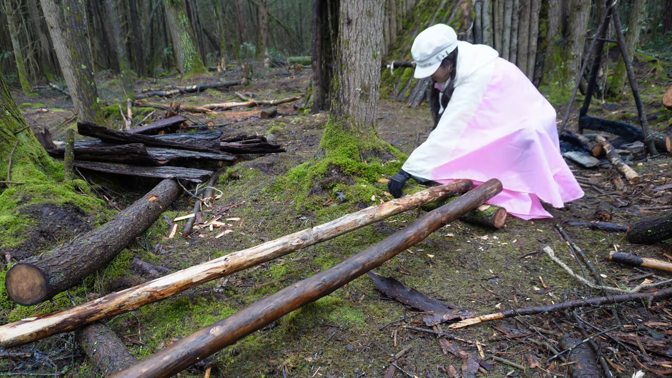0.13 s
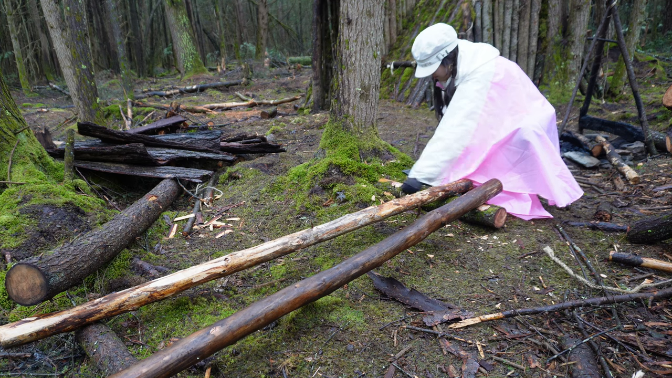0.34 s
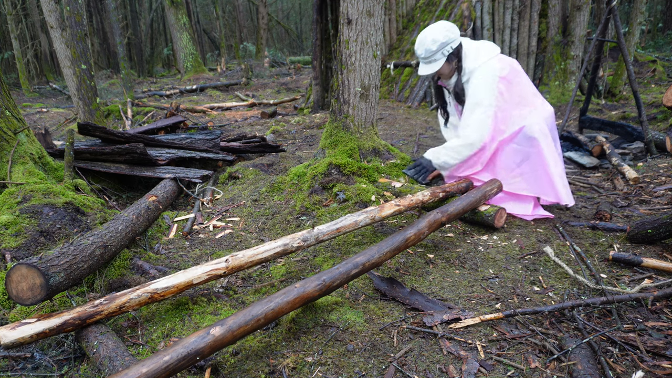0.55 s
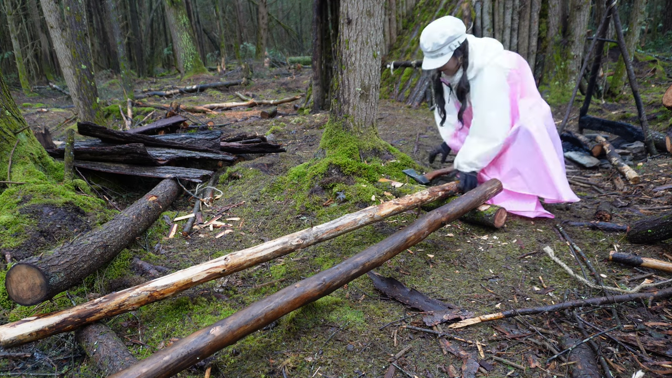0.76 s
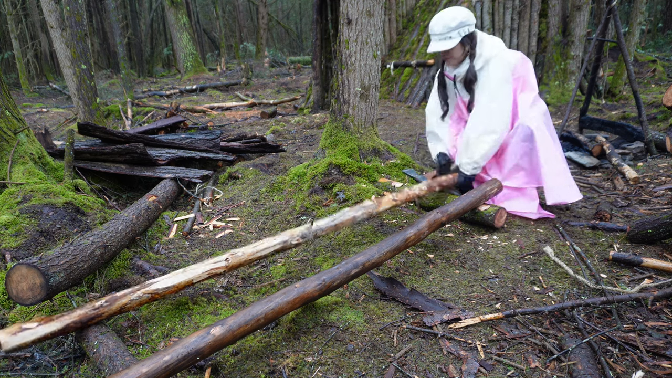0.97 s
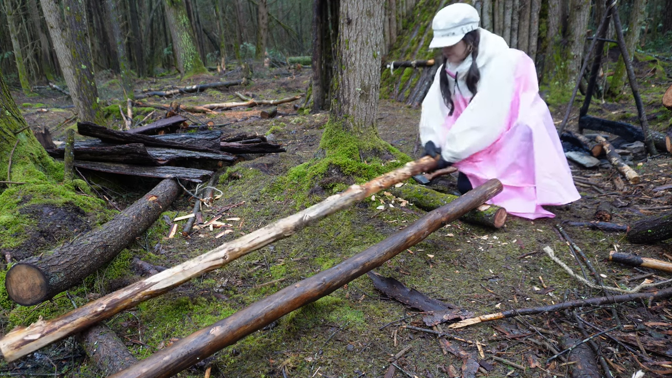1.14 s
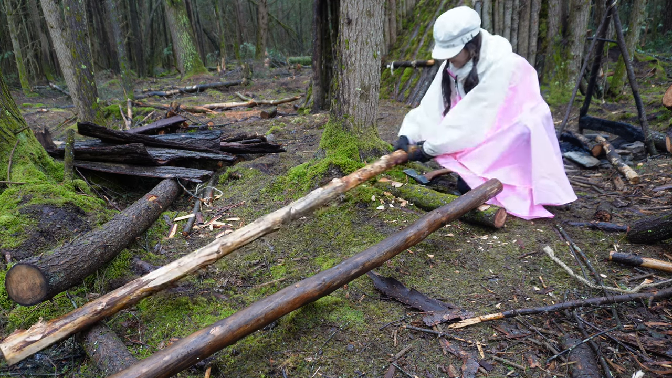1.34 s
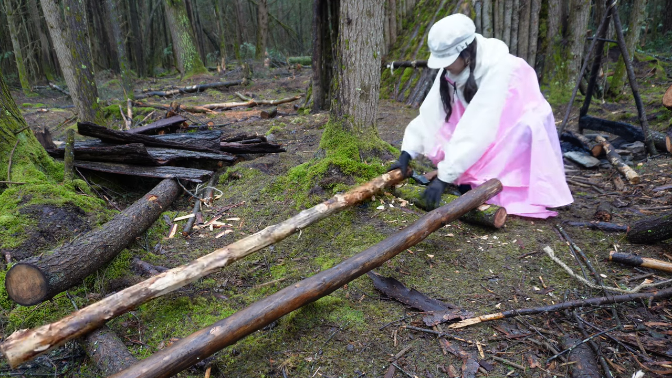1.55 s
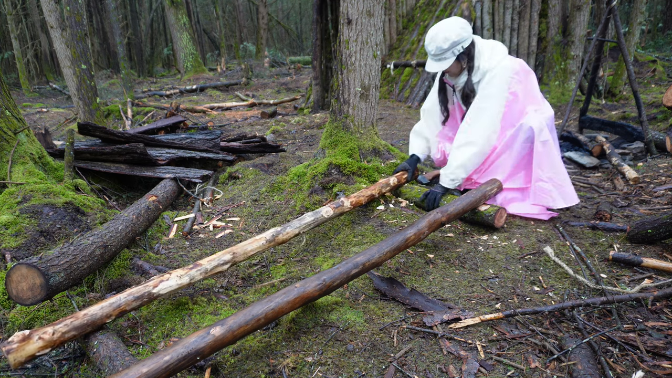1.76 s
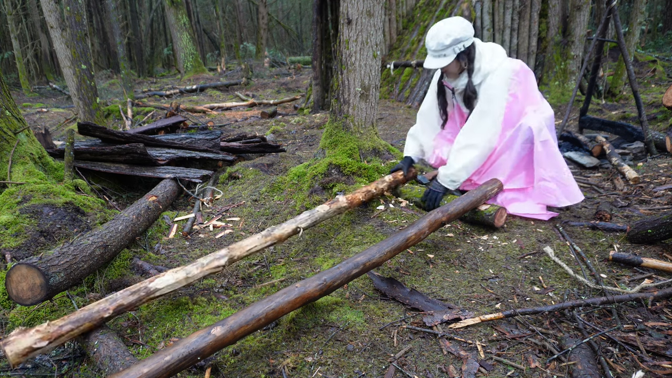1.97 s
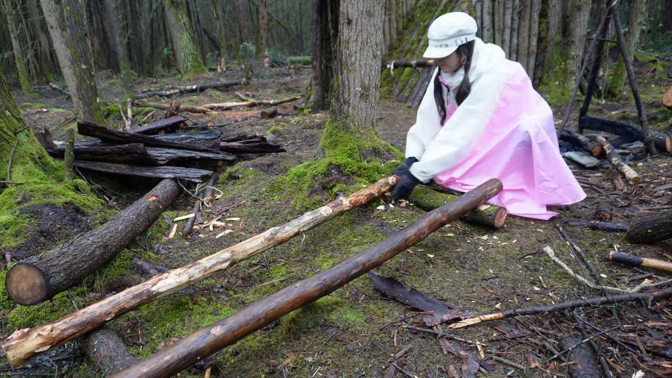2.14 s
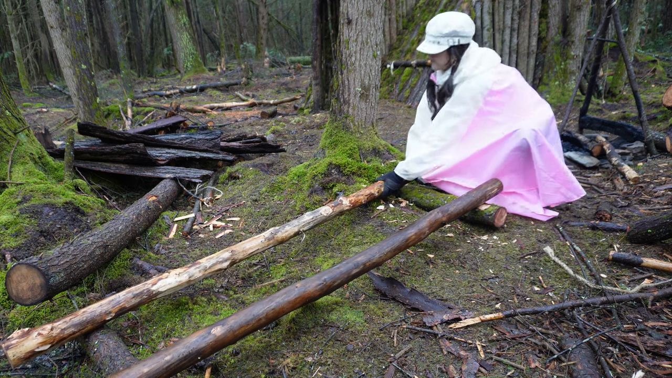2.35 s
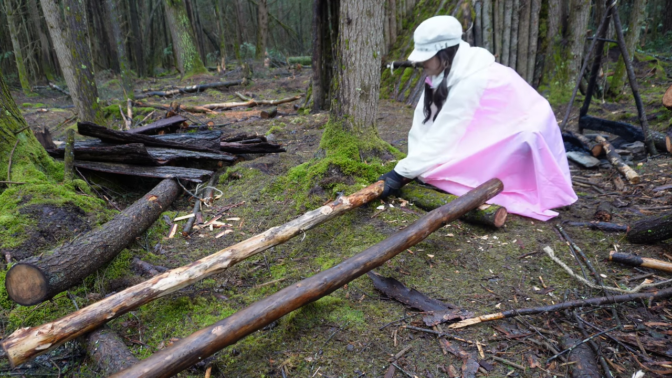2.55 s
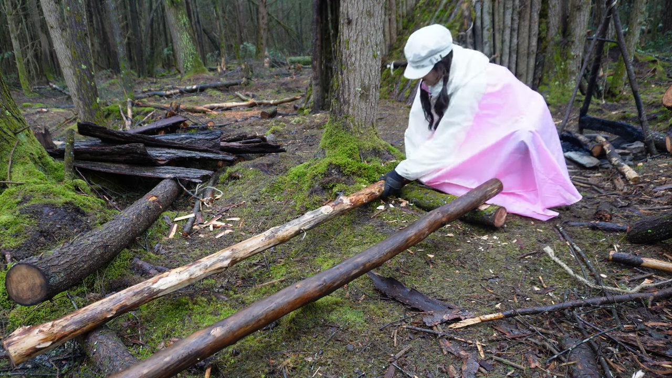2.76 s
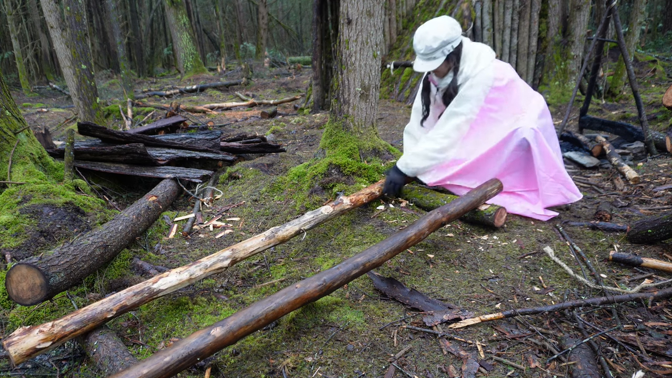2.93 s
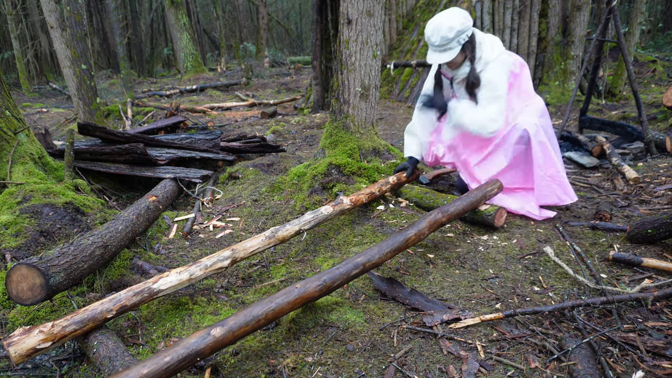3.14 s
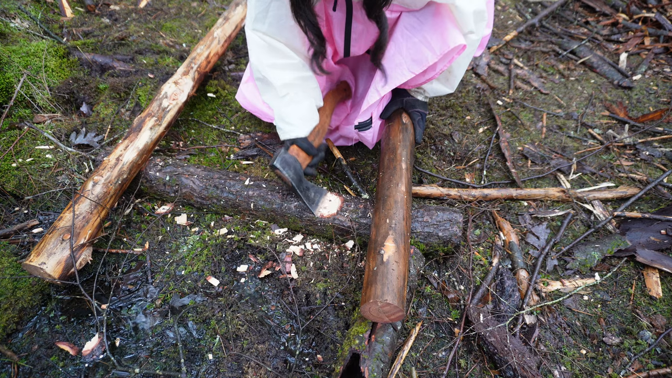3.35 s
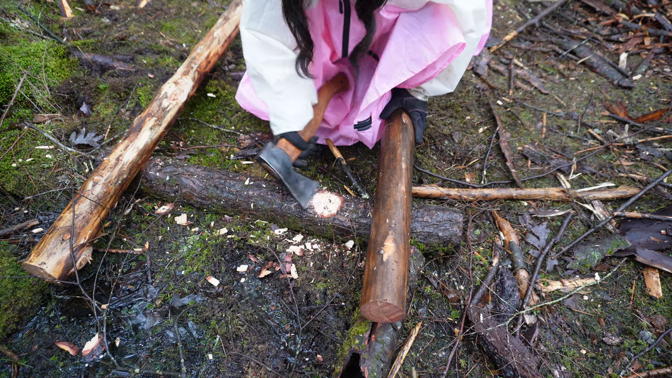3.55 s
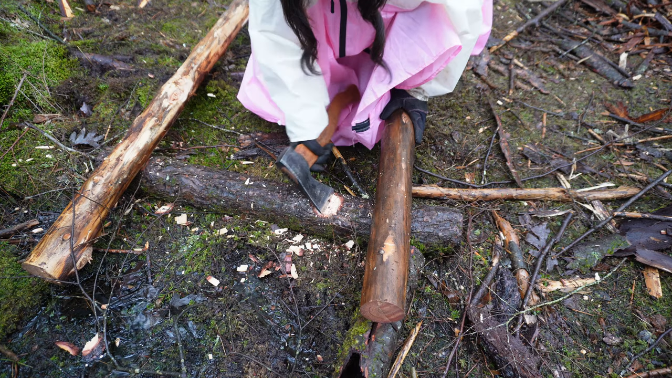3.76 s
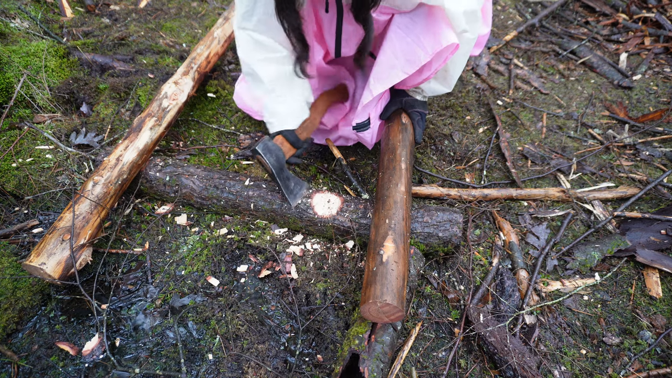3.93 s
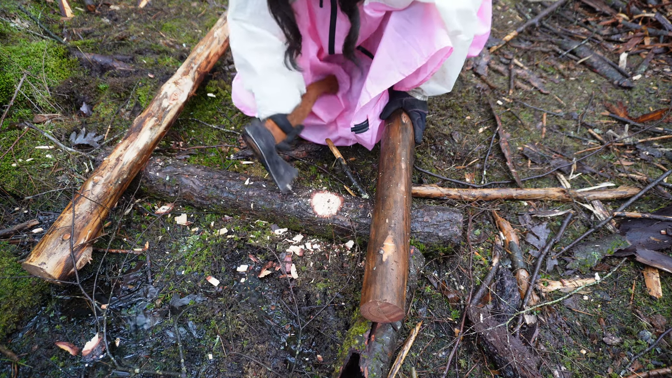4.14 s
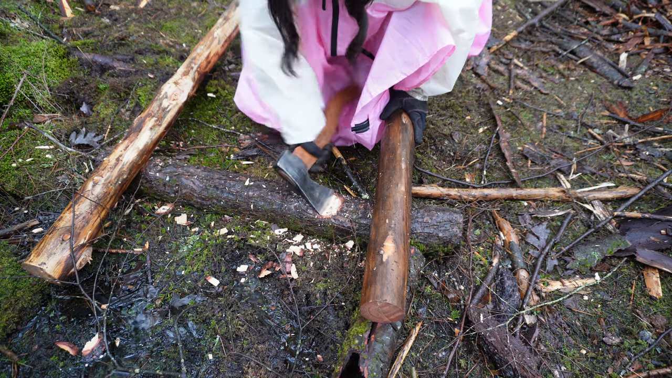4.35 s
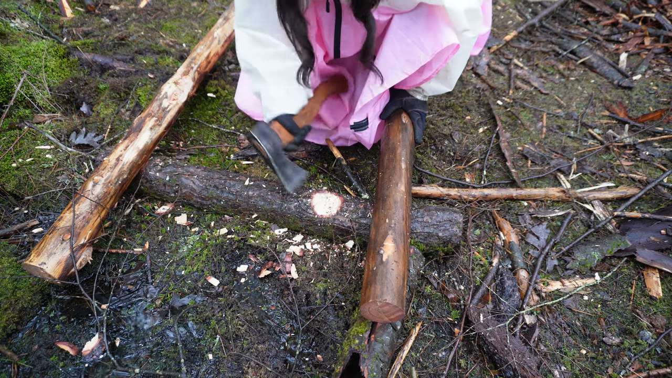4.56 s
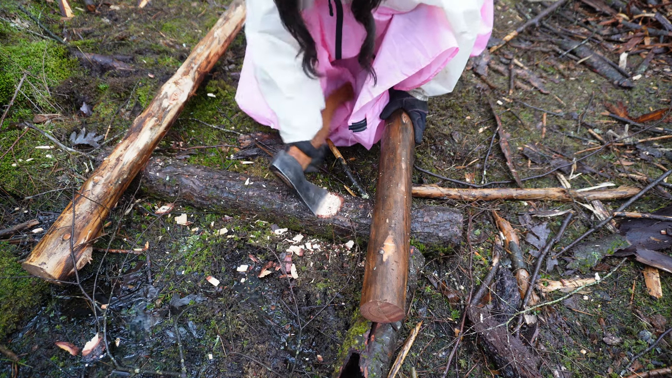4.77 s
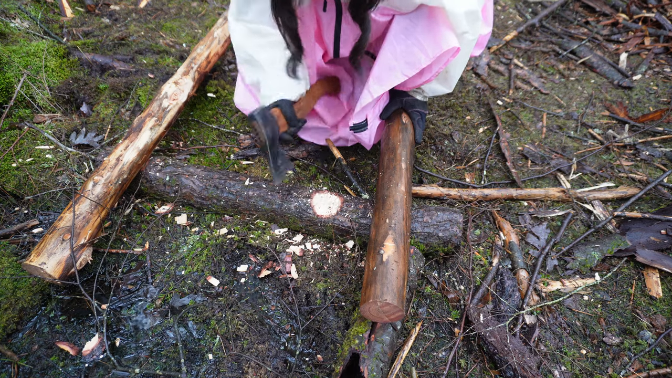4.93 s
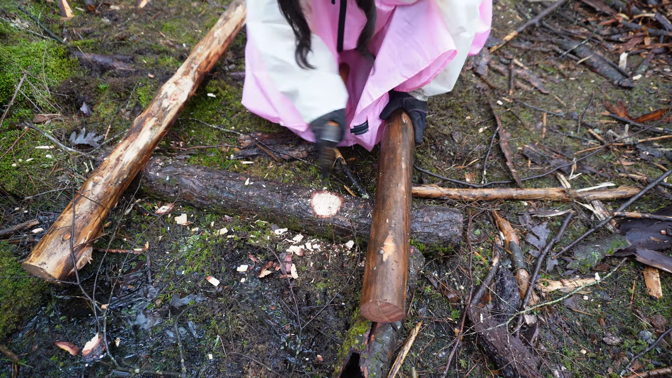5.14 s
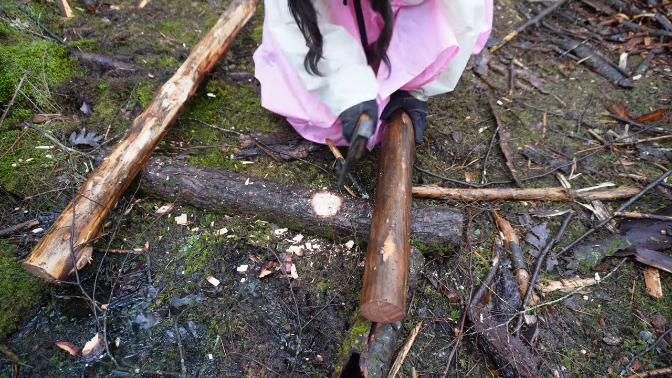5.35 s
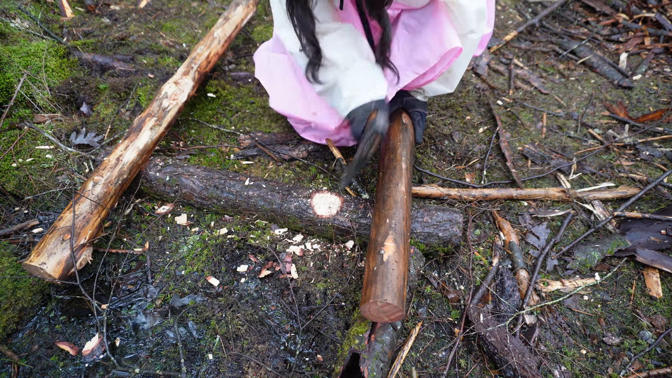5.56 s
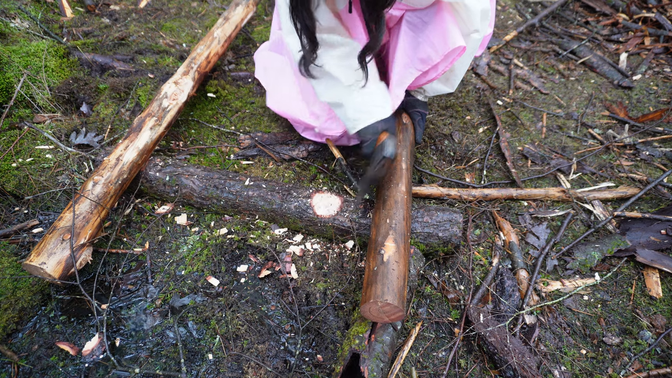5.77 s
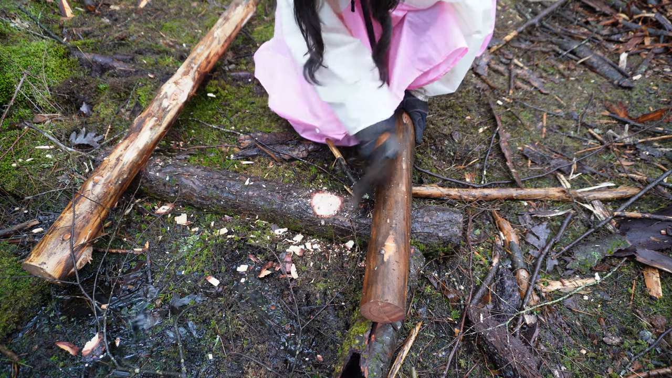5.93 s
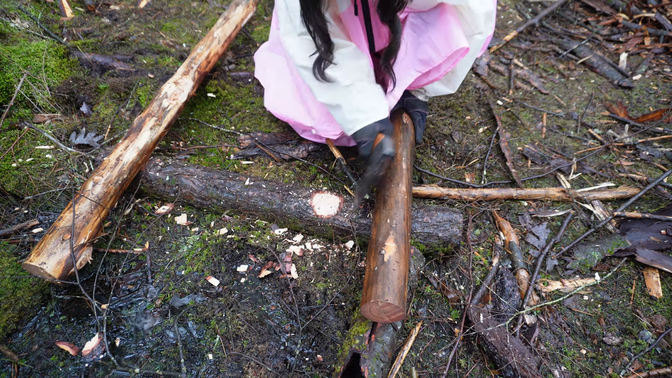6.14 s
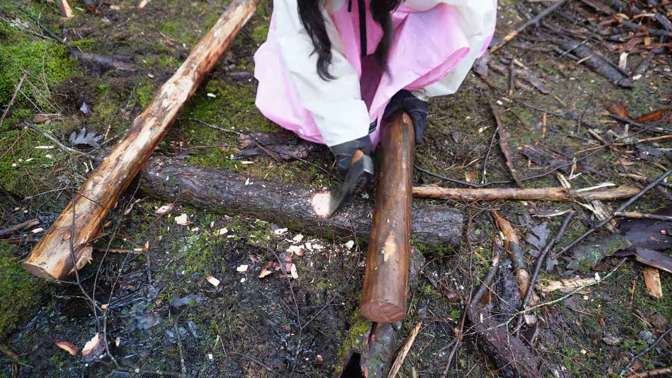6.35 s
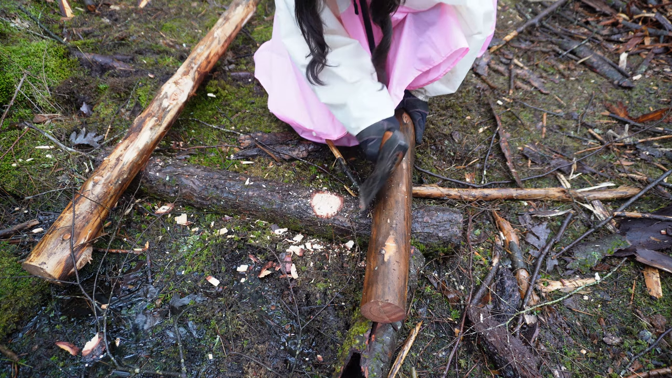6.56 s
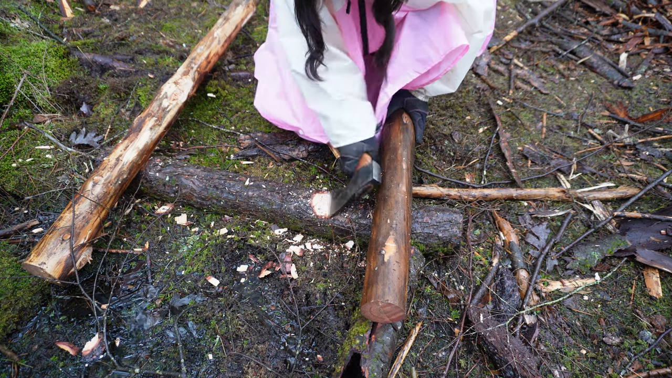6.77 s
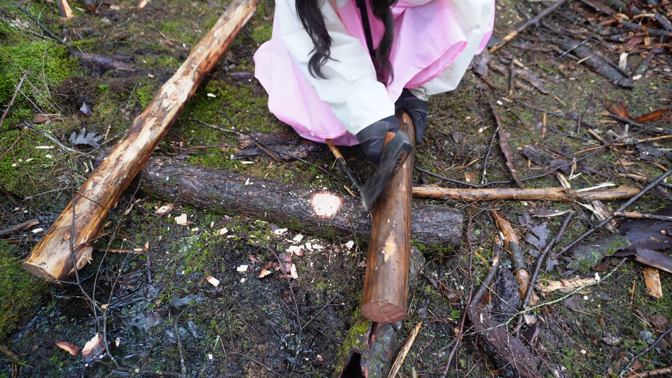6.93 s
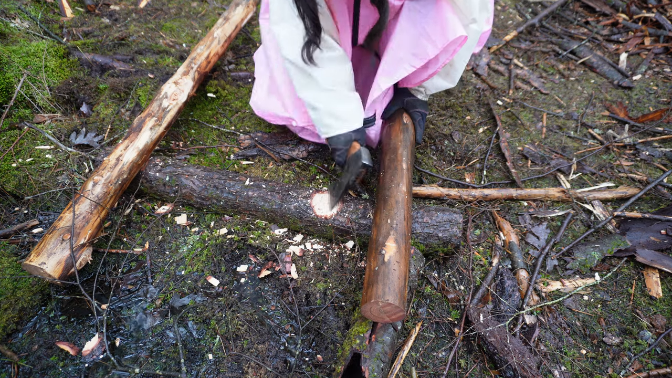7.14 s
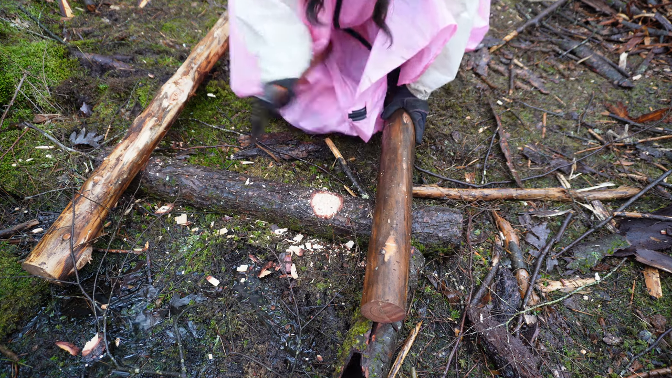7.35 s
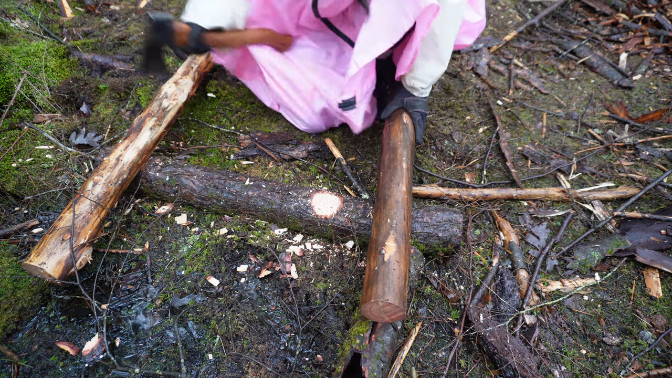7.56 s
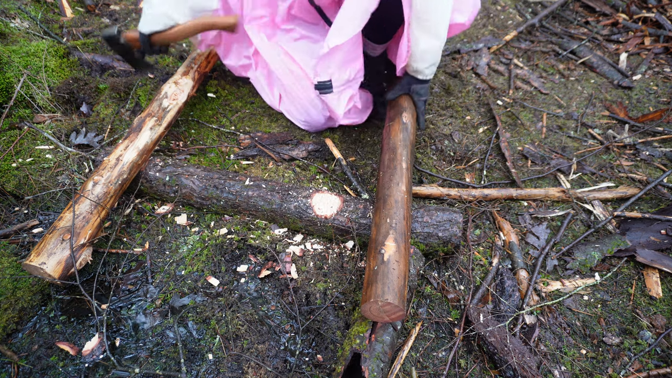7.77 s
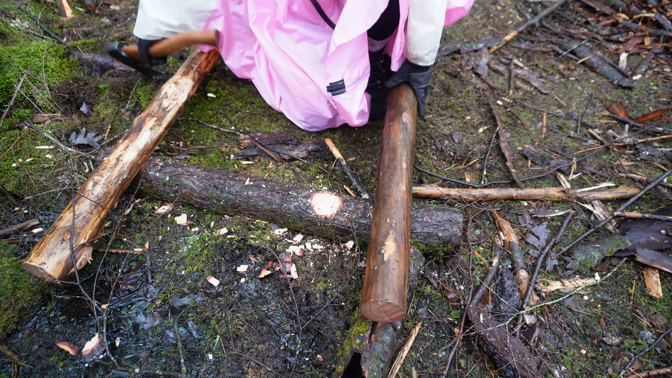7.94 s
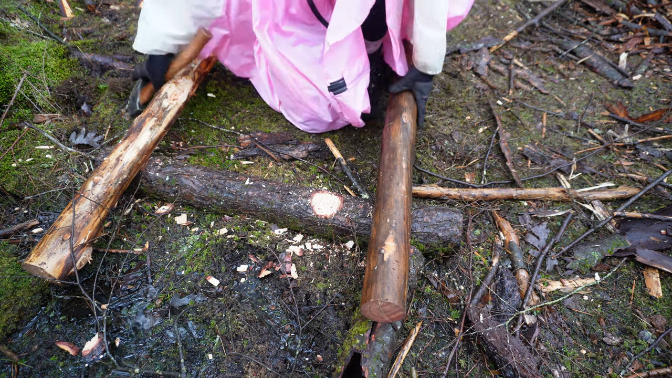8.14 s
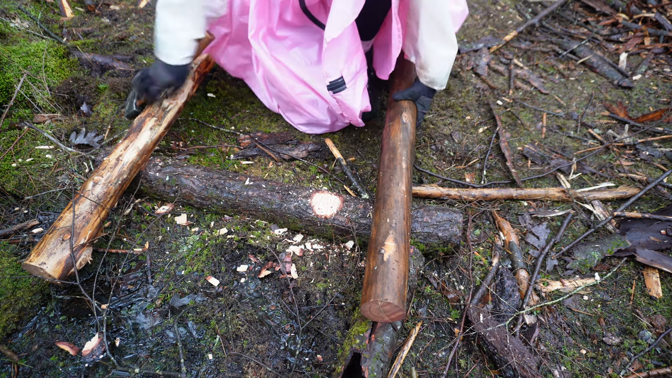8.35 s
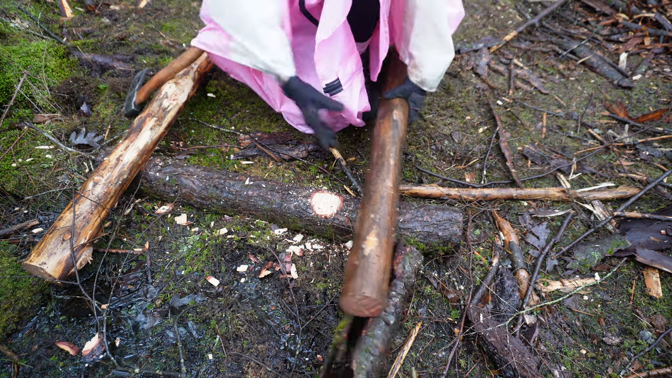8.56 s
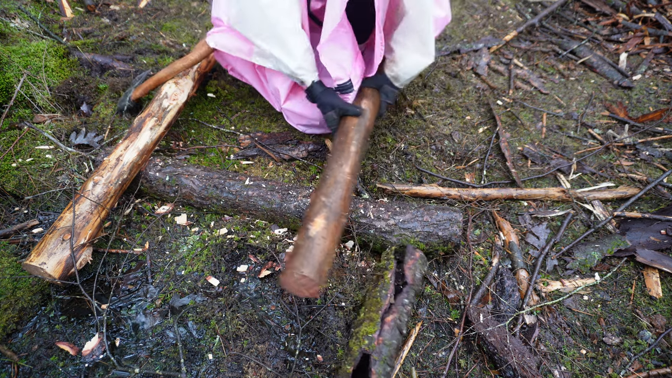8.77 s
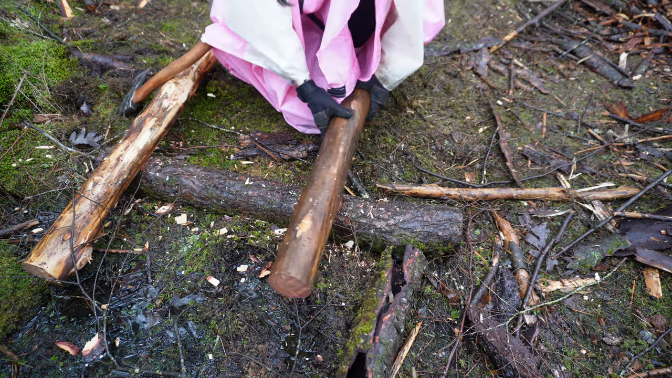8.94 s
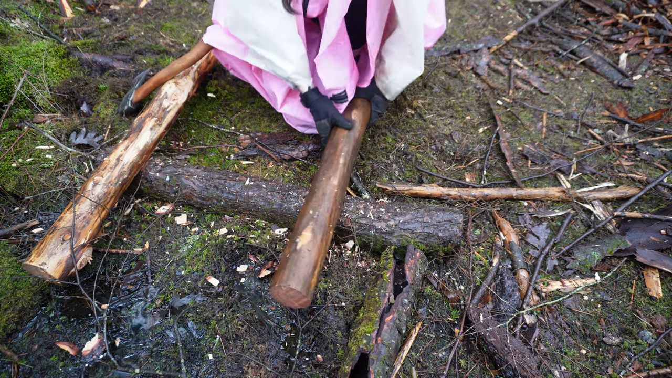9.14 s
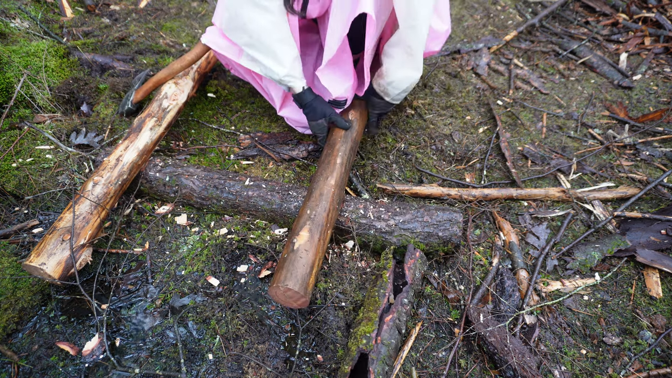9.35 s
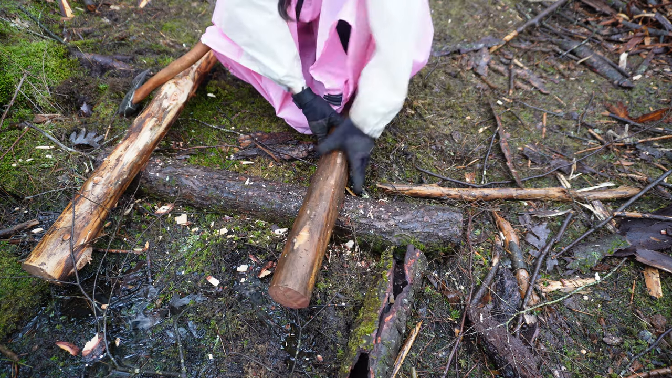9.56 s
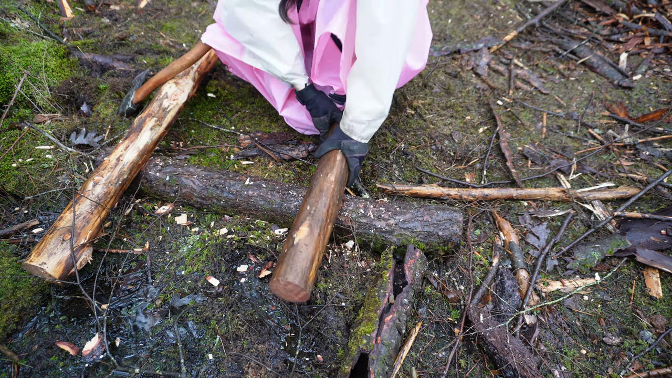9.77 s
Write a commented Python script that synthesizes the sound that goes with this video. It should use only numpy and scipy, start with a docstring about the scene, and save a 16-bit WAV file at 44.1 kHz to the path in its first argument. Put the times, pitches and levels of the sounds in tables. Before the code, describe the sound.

Close and dry outdoors: faint low wind and woodland hiss under rubbing fabric and small twig crackles. After a quiet start come about nine firm axe blows on wet wood, roughly three per second at the fastest, short and woody with a metallic edge. A pause with loud coat swishes follows, then a hollow clack of axe on peeled trunk, busy rustling and chips, and one heavy dull knock.

```python
"""Trimming a pole with a hand axe

A hand axe trims and knocks a wet pole lying across a log on mossy ground: noisy and smooth pushes ring damped
modes. Chips are crackly bursts, a raincoat rustles as shaped noise over forest hiss and wind, and a loose
peeled trunk rings when the axe knocks it or the pole drops onto it. Each hit also sends a slow sway through the
stand. Both channels carry one sound, but their phases slip apart in patches; once the level dips briefly."""
import sys
import numpy as np
from scipy import signal
from scipy.io import wavfile
from scipy.ndimage import uniform_filter1d

SR = 44100
rng = np.random.default_rng(int(sys.argv[2]) if len(sys.argv) > 2 else 0)


def digitize_waveform(pressure):
    """Quantize a signal to 16-bit integers and store it at the path in sys.argv[1].

    Rows of a 2-D input are taken as channels; values are limited to [-1, 1].
    """
    field = np.atleast_2d(pressure).T
    bounded = np.clip(field, -1, 1)
    quanta = np.round(bounded * 32767).astype(np.int16)
    wavfile.write(sys.argv[1], SR, quanta)


N = 432180
REALIGN_S = 3.347  # the level dips and all bands fall into step


def gain_of(db):
    """Amplitude factor of a level in dB."""
    return 10 ** (np.asarray(db) / 20)


def evened(x):
    """Scale to an rms of 1."""
    return x / np.sqrt(np.mean(x ** 2) + 1e-20)


def read(points, hz):
    """Read a spectrum table along a logarithmic frequency axis."""
    f, value = np.transpose(points)
    return np.interp(np.log(hz + 1), np.log(f + 1), value)


def add(mix, s, sound):
    """Lay a sound into the mix, starting at s seconds."""
    part = mix[round(s * SR):][:len(sound)]
    part += sound[:len(part)]


def ring(drive, hz, t60):
    """One decaying mode driven by a short force, with peak 1."""
    pole = np.exp(2j * np.pi * hz / SR - np.log(1000) / (t60 * SR))
    out = signal.lfilter([1], [1, -pole], drive + 0j).imag
    return out / (abs(out).max() + 1e-12)


def bite(ms, size=4096):
    """Bell-shaped force, centred 30 ms in; ms is its standard deviation."""
    from_centre_ms = (np.arange(size) / SR - .03) * 1000
    return np.exp(-.5 * (from_centre_ms / max(ms, .1)) ** 2)


def noise(level_db, patchy_db, flicker_db):
    """Random short-time spectra shaped by level_db(t, hz), with drifting patches and wideband flicker."""
    frames, hz = N // 128 + 5, np.fft.rfftfreq(512, 1 / SR)
    real, imaginary, patches = rng.standard_normal((frames, 257, 3)).T
    patches = uniform_filter1d(patches, size=8, axis=0)  # blur across frequency
    patches = evened(uniform_filter1d(patches, size=14, axis=1))  # blur across time
    flicker = evened(uniform_filter1d(rng.standard_normal(frames), size=3))
    t = np.arange(frames) * 128 / SR
    total_db = level_db(t, hz[:, None]) + patchy_db * patches + flicker_db * flicker
    z = (real + 1j * imaginary) * gain_of(total_db)
    return signal.istft(z, nperseg=512, noverlap=384)[1][:N]


def forest():
    """Steady hiss of the wet wood as coloured noise, and lumpy low wind as noise in a 12-60 Hz band."""
    # still forest, relative spectrum: f/Hz, density/dB per Hz
    hiss_colour = [(40, -73), (80, -79), (160, -64), (320, -69), (640, -70.5), (1250, -78.5), (2500, -75.5),
                   (4000, -129), (6000, -103.5), (7200, -96), (8400, -100.5), (9600, -99), (11000, -101),
                   (13000, -100), (15500, -107)]
    # wind strength, interpolated: t/s, level/dB
    gusts = [(0, -46), (1.15, -58.5), (1.65, -42), (2.3, -51.5), (3.1, -49.5), (3.6, -48.5), (5.2, -54.5),
             (7.6, -56), (9.8, -48)]
    hiss_db = -51.5  # rms
    hiss = evened(noise(lambda t, hz: read(hiss_colour, hz) + 0 * t, patchy_db=1.0, flicker_db=2.0))
    low_band = signal.butter(2, [12, 60], "band", fs=SR, output="sos")
    wind = evened(signal.sosfilt(low_band, rng.standard_normal(N)))
    s, wind_db = np.transpose(gusts)
    return gain_of(hiss_db) * hiss + gain_of(np.interp(np.arange(N) / SR, s, wind_db)) * wind


def movement(t):
    """Level and brightness of the coat in dB: the powers of running rustle and swishes add up."""
    # coat and hands moving, interpolated: t/s, level/dB, brightness/dB at the top of the band
    rustle = [(0, -50.5, -0.5), (0.903, -45.5, -1.5), (1.302, -43, -5.5), (1.799, -56, -1.5),
              (2.271, -40.5, -3.5), (2.42, -47, -3), (2.948, -51, -3), (3.1, -45, 5), (3.503, -47.5, 0),
              (3.818, -42.5, 2), (4.651, -46.5, -1), (5.452, -41, 1.5), (5.953, -45.5, -0.5),
              (7.018, -45.5, 1), (7.2, -40.5, -2), (7.8, -36.5, 7.5), (8.0, -41.5, -4), (8.351, -40.5, 2),
              (8.583, -34, 7.5), (8.82, -41, -2), (9.349, -47, -1), (9.8, -41, -3)]
    # single swishes of a sleeve: peak t/s, level/dB, half length/s, brightness/dB
    swishes = [(0.216, -42, .05, -1.5), (0.484, -44.5, .03, -9), (0.757, -42, .06, 2.5),
               (0.965, -42, .05, -5.5), (1.28, -46, .06, 8), (1.699, -43.5, .04, -5.5),
               (3.162, -48, .05, -13), (3.255, -42, 0.032, 1.5), (3.724, -39.5, .03, -2),
               (4.117, -42.5, 0.038, 8.5), (4.238, -43, .04, 1.5), (4.408, -39, .04, -7),
               (5.053, -45.5, 0.077, 6.5), (5.642, -38, .04, 5.5), (5.809, -44, .05, 7.5),
               (6.539, -41, 0.027, -2), (6.857, -35, .02, -7), (7.641, -31.5, .04, 4),
               (7.865, -37, .03, -12), (8.117, -41, .03, -21), (8.43, -32, .04, 1.5),
               (8.594, -31.5, .04, -2.5), (8.873, -41, .04, 5.5), (9.206, -40, .04, -3),
               (9.497, -36, .04, 0.5), (9.65, -39, 0.059, -3)]
    s, level_db, bright_db = np.transpose(rustle)
    peak, swish_db, half, swish_bright_db = np.transpose(swishes)[:, :, None]
    bed = gain_of(np.interp(t, s, level_db)) ** 2
    swish = gain_of(swish_db) ** 2 * np.exp(-((t - peak) / half) ** 2)
    power = bed + swish.sum(axis=0)
    # brightness is averaged by power
    brightness = (bed * np.interp(t, s, bright_db) + (swish * swish_bright_db).sum(axis=0)) / power
    return 10 * np.log10(power), brightness


def coat():
    """Rubbing fabric: noise that follows the movement, with small creases snapping on top."""
    # rubbing fabric, relative spectrum: f/Hz, density/dB per Hz
    fabric = [(40, -75), (80, -61), (160, -115), (320, -68), (640, -65), (1250, -64.5), (2500, -67),
              (4000, -67), (6000, -70), (7200, -71), (8400, -67), (9600, -77.5), (11000, -78.5),
              (13000, -76), (15500, -83.5)]

    def colour(t, hz):
        """Fabric spectrum at the moving level; brightness fades in from 2.2 to 5.5 kHz."""
        level_db, bright_db = movement(t)
        share = np.clip(np.log(hz / 2200 + 1e-9) / np.log(2.5), 0, 1)
        return read(fabric, hz) + level_db + share * bright_db

    rub = noise(colour, patchy_db=2.0, flicker_db=1.06)
    snaps = rng.random(N) < 500 / SR  # about 500 per second
    creases = gain_of(0.8 * np.minimum(rng.exponential(1, N), 5)) * snaps
    crackle = evened(signal.oaconvolve(creases, np.hanning(90))[:N])
    return gain_of(50.5) * rub * (1 + 0.075 * crackle)


def litter():
    """Small twigs stirred by the coat: chips at random moments, denser and louder while it moves."""
    count, over_db, spread_db = 50, 3, 4  # least peak over the coat level, upward scatter
    middle_hz = 1600  # pitches lie within an octave either side
    t = np.arange(.05, N / SR - .1, .001)
    level_db = movement(t)[0]
    busy = np.cumsum(gain_of(level_db))
    when, size, pitch = rng.random((count, 3)).T
    s = np.interp(when * busy[-1], busy, t)
    peak_db = np.interp(s, t, level_db) + over_db - spread_db * np.log(1 - .9 * size)
    return list(zip(s, peak_db, middle_hz * 2 ** (2 * pitch - 1)))


def chips():
    """Chips and twigs land: short crackly noise bursts through a broad resonance."""
    # chips and twigs: t/s, level/dB, centre f/Hz
    landings = [(0.169, -32, 2360), (0.252, -18.5, 4230), (0.266, -29, 2420), (0.477, -25, 1570),
                (0.513, -26.5, 1520), (0.524, -33, 1590), (0.727, -29, 1410), (0.762, -28, 950),
                (1.053, -32, 2720), (1.095, -27.5, 1590), (3.017, -33.5, 1400), (3.074, -32.5, 1230),
                (3.087, -34, 1900), (3.114, -44, 1500), (3.147, -30, 1530), (3.164, -49, 900),
                (3.172, -22, 1270), (3.217, -28, 1240), (3.227, -40, 1350), (3.243, -30, 1250),
                (3.258, -33, 1700), (3.702, -34, 2850), (5.309, -32, 1520), (5.71, -15.5, 2280),
                (6.125, -18, 2390), (6.454, -19, 1960), (6.547, -20.5, 8040), (6.794, -21.5, 7000),
                (6.835, -20, 2070), (7.435, -20, 1320), (7.476, -27, 2030), (7.599, -17.5, 1780),
                (7.62, -17.5, 2120), (7.858, -20.5, 980), (7.87, -31, 1400), (8.171, -28, 2650),
                (8.438, -21, 3270), (8.476, -17.5, 3950), (8.526, -18.5, 2500), (8.603, -13.5, 1780),
                (8.7, -19, 1440), (8.754, -24.5, 1600), (1.722, -31, 2300), (9.474, -30, 2350),
                (9.51, -20, 2420), (9.637, -20.5, 1160)]
    chip_ms = 3.7
    out = np.zeros(N)
    rising = np.arange(4096) < .03 * SR
    envelope = np.where(rising, bite(chip_ms * .65), bite(chip_ms))  # rises faster than it falls
    for s, peak_db, hz in landings + litter():
        bassless = signal.lfilter([1, -1], [1, -.9], rng.standard_normal(4096))
        burst = envelope * bassless
        chip = ring(burst, hz, 5 / hz + 0.00024) + 0.006 * burst
        add(out, s - .029, gain_of(peak_db) * chip)
    return out


def trees(x):
    """A faint, dull, short wash of echoes from the ground and the trunks around: decaying noise."""
    t = np.arange(9000) / SR
    tail = rng.standard_normal(9000) * gain_of(-60 * t / 0.17) * (t > .006)
    tail = signal.sosfilt(signal.butter(1, [400, 2500], "band", fs=SR, output="sos"), tail)
    return signal.oaconvolve(x, tail / np.linalg.norm(tail))[:N]


def swing(hz, ms, lag_ms):
    """A push on the wood: a sine at its own pitch under a bell-shaped force, shifted by the lag."""
    sway = np.sin(2 * np.pi * hz * (np.arange(4096) / SR - .03))
    return np.roll(bite(ms) * sway, round(lag_ms * SR / 1000))


def blows():
    """Chops and knocks: a noisy tearing force drives the upper modes, a smooth push thuds pole and ground."""
    # axe blows and knocks on the pole or log: t/s, thud f/Hz, thud/dB, knock/dB, crack/dB, blade/dB,
    # splinter/dB, stand shake/dB, bite/ms, knock f/Hz, blade f/Hz, thud lag/ms
    strikes = [(0.461, 243, -35.5, -33, -55, -60, -60, -60, 2, 640, 3100, 1.2),
               (1.607, 172, -26, -40, -40.5, -54, -42, -35, 15, 710, 3060, 0),
               (3.388, 302, -8, -12, -24.5, -25, -35, -45, 5.9, 662, 2940, -1.2),
               (3.645, 273, -30.5, -46, -55, -60, -60, -60, 3, 640, 3100, 1.2),
               (3.731, 277, -15, -16, -18.5, -11, -24, -24, 3.4, 660, 2910, 1.1),
               (4.002, 268, -16.5, -24.5, -27, -20, -18.5, -25, 2.9, 652, 3100, -1),
               (4.402, 287, -11, -11, -44, -11.5, -12, -20, 2.6, 640, 2630, -1.8),
               (4.409, 273, -40, -39, -48, -5, -28, -43, 2.5, 660, 3110, -6),
               (4.733, 300, -14.5, -15.5, -16.5, -9, -17, -31, 2.63, 640, 3030, -1),
               (5.678, 282, -5, -14.5, -18, -16, -22.5, -14, 3.9, 667, 3000, 1.3),
               (6.033, 291, -7, -12, -12.5, -5.5, -15, -14.5, 0.94, 620, 3260, 2.1),
               (6.361, 277, -3, -35, -15.5, -12.5, -13, -11, 1.35, 640, 3330, 1.6),
               (6.714, 295, -8.5, -15, -15, -9.5, -14, -20.5, 1.65, 620, 3180, 0.5),
               (7.097, 320, -10.5, -19, -18, -4.5, -13.5, -16, 1.44, 675, 3240, 5),
               (7.888, 212, -18, -22, -21, -16.5, -24, -46, 3, 640, 2920, 1.4),
               (7.895, 350, -15, -30, -42, -44, -45, -55, 3.3, 680, 3100, -0.3),
               (8.083, 212, -21, -13, -19.5, -32, -50, -25.5, 5.1, 555, 2870, 0.5),
               (9.201, 281, -5.5, -18.5, -27.5, -20, -17.5, -24, 6.4, 676, 2880, -1.1)]
    # damped pole and log, then the axe head: f/Hz, level/dB, t60/s,
    # column of the strike that sets the level (rounded, counted from 0; some upper modes follow the shake)
    knock_modes = [(454, -3.5, 0.027, 3), (900, -42, 0.095, 3), (1240, -6, 0.0021, 4), (1470, -6, 0.018, 4),
                   (1760, -4, 0.021, 4), (2150, -1, 0.014, 4), (2650, -18, 0.0087, 5),
                   (3770, -1, 0.0048, 6.72), (4810, -2.5, 0.0019, 6.62), (5970, -29, 0.0088, 5.7),
                   (7120, -9.5, 0.011, 6.73), (8087, -5.5, 0.011, 5.6), (11500, -15, 0.0013, 6)]
    thud_t60, knock_t60, blade_t60 = .041, .04, .013  # s
    sag_share, sag_db, sag_t60 = 0.877, -14, 0.088  # a lower, longer mode beside the thud
    shake_hz, shake_t60 = 24.8, 0.72
    crack_band = signal.butter(1, [500, 5000], "band", fs=SR, output="sos")
    # keep the lowest bass out of the blows; bounces() adds the low thumps
    no_bass = signal.butter(2, 130, "high", fs=SR, output="sos")
    out, t = np.zeros(N), np.arange(SR // 2) / SR
    for row in strikes:
        s, thud_hz, thud_db, knock_db, crack_db, blade_db, _, shake_db, ms, knock_hz, blade_hz, lag_ms = row
        # a narrow noise peak on a wider, weaker swell before and after it
        entry = bite(ms) ** 2 + .15 * bite(3.5 * ms)
        tear = entry * rng.standard_normal(4096) * gain_of(3.0 * rng.standard_normal(4096))
        push = swing(thud_hz, 2.1, lag_ms)
        thud = ring(push, thud_hz, thud_t60) + 0.07 * ring(push, thud_hz * 0.53, 0.03)
        sound = gain_of(thud_db) * thud
        sound += gain_of(thud_db + sag_db) * ring(push, thud_hz * sag_share, sag_t60)
        crack = signal.sosfilt(crack_band, tear)  # fibres snap between the modes too
        sound += gain_of(crack_db - 4.0) * crack / abs(crack).max()
        jolt = np.roll(tear * bite(ms * 0.2), 60)  # the pole moves just after the peak of the tear
        sound += gain_of(knock_db) * ring(jolt, knock_hz, knock_t60)
        sound += gain_of(blade_db - 1) * ring(tear, blade_hz, blade_t60)
        for hz, db, t60, column in knock_modes:
            spread = 1 + .02 * rng.standard_normal()  # each hit lands on another spot
            drive = tear if hz > 1100 else jolt
            sound += gain_of(row[int(round(column))] + db) * ring(drive, hz * spread, t60)
        add(out, s - .03, signal.sosfilt(no_bass, sound))
        sway = (1 - np.exp(-(t / .1) ** 3)) * gain_of(-60 * t / shake_t60)  # arrives through the ground
        add(out, s, gain_of(shake_db) * sway * np.sin(2 * np.pi * shake_hz * t))
    return out


def trunk():
    """All modes of the loose trunk start together under a blunt tap; each tap finds its own balance."""
    # touches: t/s, level/dB, pitch factor, stilled after/s, favoured f/Hz, fall away from it/dB per octave
    touches = [(1.609, -34.5, 1.08, .02, 350, 10), (1.63, -26, 1., 0.16, 323, 26),
               (1.69, -42, 1.01, .09, 705, 22), (1.72, -38.5, 1.01, .06, 705, 15),
               (1.74, -47, 1.01, 0.036, 705, 16), (8.0795, -12, 1., .06, 1000, 1),
               (8.0895, -17, 1., 0.067, 606, 3), (8.1094, -14.5, 1., .04, 900, 14),
               (8.116, -14.5, 1., 0.02, 320, 8), (9.217, -19.5, .955, .09, 690, 27),
               (9.236, -25, .955, 0.11, 506, 29)]
    # modes of the freely lying trunk: f/Hz, level/dB, t60/s
    trunk_modes = [(205, -9, .12), (323, -3, .18), (436, -12, .05), (506, -2, .17), (545, -10, .06),
                   (705, 0, .19), (942, -5, .19), (1184, -5, .15), (1437, -8, .10), (1696, -6, .07),
                   (2342, -13, .06), (2600, -13, .06)]
    out = np.zeros(N)
    tap = np.diff(bite(0.26, size=9000), prepend=0)
    for s, level_db, factor, stilled, favoured_hz, fall_db in touches:
        grip = np.exp(-(np.arange(9000) / SR / (stilled + .03)) ** 4)  # moss and hand soon still it
        spot_db = 1.5 * rng.standard_normal(len(trunk_modes))
        modes = np.zeros(9000)
        for k, (hz, db, t60) in enumerate(trunk_modes):
            mode_db = db + spot_db[k] - fall_db * abs(np.log2(hz / favoured_hz))
            modes += (-1) ** k * gain_of(mode_db) * ring(tap, hz * factor, t60)  # signs alternate
        add(out, s - .03, gain_of(level_db) * grip * modes)
    return out


def bounces():
    """The pole rebounds on the log and the log thumps the ground: dull thud and knock, no tearing."""
    # rebounds: t/s, thud f/Hz, thud/dB, knock f/Hz, knock/dB
    rebounds = [(1.627, 192, -27, 700, -50), (1.665, 150, -35, 700, -52), (3.401, 314, -17, 650, -39),
                (3.419, 280, -27, 634, -41), (3.426, 278, -25, 660, -30), (3.45, 170, -37, 626, -50),
                (3.744, 292, -28, 504, -33), (3.757, 169, -33, 640, -38), (4.012, 210, -37, 693, -32),
                (4.413, 270, -31, 645, -20), (4.421, 290, -22, 526, -24), (4.745, 280, -45, 494, -30),
                (5.699, 257, -23, 665, -23.5), (5.72, 248, -34, 520, -34), (6.044, 282, -38, 648, -15.5),
                (6.058, 300, -25, 504, -31), (6.077, 283, -37, 520, -31), (6.372, 254, -27, 666, -30),
                (6.725, 258, -30, 637, -17.5), (6.739, 300, -31, 506, -27), (6.768, 270, -43, 516, -39),
                (7.11, 260, -21, 490, -24.5), (7.126, 200, -33, 500, -36), (7.14, 280, -43, 497, -36),
                (9.215, 256, -23, 485, -28), (4.001, 106, -23, 170, -24), (4.41, 110, -27, 170, -25),
                (4.74, 160, -34, 640, -38), (5.675, 90, -28, 500, -25), (6.03, 90, -29.5, 170, -40),
                (6.359, 90, -23, 496, -32), (6.713, 90, -27, 170, -23), (7.096, 100, -32, 180, -25),
                (7.892, 95, -24.5, 480, -21), (9.199, 95, -19, 170, -21)]
    push_ms, t60 = 0.76, 0.056  # t60 in s
    out = np.zeros(N)
    for s, thud_hz, thud_db, knock_hz, knock_db in rebounds:
        thud = gain_of(thud_db) * ring(swing(thud_hz, push_ms, 0), thud_hz, t60)
        knock = gain_of(knock_db) * ring(swing(knock_hz, push_ms, 0), knock_hz, t60)
        add(out, s - .03, thud + knock)
    return out


def scene():
    """Axe work with its faint echoes, the coat and the forest, the same in both channels."""
    hits = blows() + bounces() + trunk() + chips()
    mono = hits + gain_of(-24) * trees(hits) + coat() + forest()
    return np.array([mono, mono])


def slips(t, hz):
    """Left channel's phase lead: patches are born, hold their angle, and their borders wander."""
    # set patches that jump to a new lead: t/s, low f/Hz, high f/Hz, lead/rad
    jumps = [(0, 0, 430, -2.5), (0, 430, 3600, -.5), (.4, 0, 800, -1.5), (.68, 0, 1200, 1.4),
             (1.15, 1600, 3600, 1), (1.48, 0, 1300, -.6), (2.02, 600, 820, 2.7), (2.11, 200, 600, 2.7),
             (2.2, 0, 200, 2.8), (2.2, 1100, 1500, .9), (2.25, 1500, 3600, 1.9), (2.3, 820, 1100, 1),
             (2.55, 600, 820, 1.6), (2.6, 1100, 1500, -2), (2.7, 600, 820, 2.7), (2.7, 820, 1100, -1.7),
             (2.69, 0, 200, -1.7), (2.85, 2200, 2800, 3.1), (2.9, 2950, 3400, .4), (3.0, 820, 1100, 3),
             (3.0, 1100, 1900, 1), (3.81, 0, 430, 2.9), (4.0, 1900, 2300, -2.9), (4.15, 430, 1300, -.5),
             (4.2, 0, 430, -2.2), (4.25, 7300, 9300, -.4), (4.55, 0, 430, -.7), (4.65, 1900, 3300, 1),
             (5.15, 2950, 3400, 3.1), (5.52, 0, 430, -2.3), (5.55, 7300, 9300, 3), (6.25, 7300, 9300, 1.7),
             (6.6, 7300, 9300, -2), (7.0, 7300, 9300, .5), (5.63, 1300, 2600, -1.1), (5.88, 200, 430, -.6),
             (5.9, 2950, 3600, 2.1), (5.9, 7300, 9300, .6), (5.94, 430, 820, 2.5), (6.22, 200, 430, 2.4),
             (6.6, 2600, 3600, -1.1), (6.6, 0, 430, 2.7), (6.6, 430, 820, 1.9), (6.95, 0, 430, 1.9),
             (6.98, 600, 820, -1), (6.95, 3400, 3850, 3.1), (7.15, 430, 620, 2), (7.75, 2700, 3300, -2.8),
             (7.8, 3350, 4100, -1.1), (7.75, 0, 430, .7), (7.75, 430, 820, 1.2), (7.99, 430, 1250, 0),
             (8.35, 2600, 3600, -.9), (8.56, 0, 430, 2.9), (8.6, 430, 820, 2.6), (8.9, 0, 200, -1.6),
             (8.98, 820, 1280, 1.7), (9.1, 0, 400, 2.9), (9.08, 400, 820, -1.6), (9.35, 0, 430, -1.3)]
    born, mid, width, angle = rng.random((len(t), 4)).T
    creep = rng.standard_normal((len(t), len(hz)))
    creep = evened(uniform_filter1d(creep, size=9, axis=1)) * .27
    creep = np.round(np.clip(creep, -1, 1)).astype(int)  # borders move by a bin at most
    lead, bins = np.zeros((len(hz), len(t))), np.arange(len(hz))
    now = 2 * np.pi * rng.random(len(hz) // 8 + 1).repeat(8)[:len(hz)]
    due = np.searchsorted(t, [row[0] for row in jumps])
    for k, s in enumerate(t):
        now = now[np.clip(bins + creep[k], 0, len(hz) - 1)]
        if born[k] < .3:
            mid_hz = 3700 + 13000 * mid[k]
            half_hz = (80 + 200 * width[k]) * (1 + 8 * (mid_hz > 12500))  # far wider at the top
            now[abs(hz - mid_hz) < half_hz] = 2 * np.pi * angle[k]
        if k and t[k - 1] < REALIGN_S <= s:
            now = 0 * now
        for row in np.flatnonzero(due == k):
            _, low, high, held = jumps[row]
            now[(hz >= low) & (hz < high)] = held
        lead[:, k] = now
    jitter = uniform_filter1d(rng.standard_normal(lead.shape), size=5, axis=1)
    return lead + .2 * evened(jitter)


def record(dry):
    """A brief level dip; the right channel lags by the slipping phase; clipping; band limit."""
    edge_hz = 15950
    dip = 0.74 * np.exp(-((np.arange(N) / SR - REALIGN_S) / 0.011) ** 4)
    dry = dry * (1 - dip)
    hz, t, z = signal.stft(dry[1], SR, nperseg=1024, noverlap=768)
    lagged = z * np.exp(-1j * slips(t, hz))
    right = signal.istft(lagged, SR, nperseg=1024, noverlap=768)[1][:N]
    pair = np.clip([dry[0], gain_of(0.42) * right], -1, 1)
    low_pass = signal.firwin(1023, edge_hz, window=("kaiser", 11), fs=SR)
    return signal.oaconvolve(pair, low_pass[None], "same")


dry = scene()
out = record(dry)
digitize_waveform(out)
```